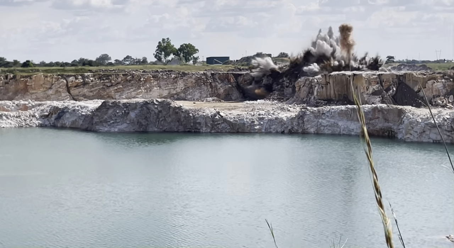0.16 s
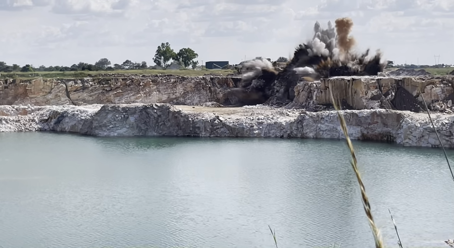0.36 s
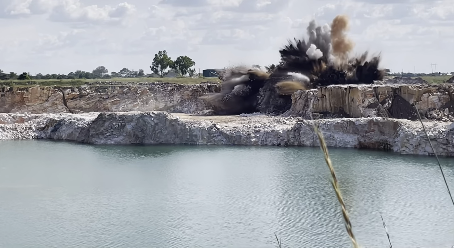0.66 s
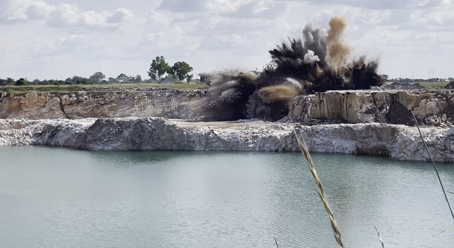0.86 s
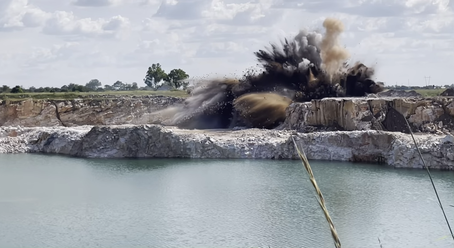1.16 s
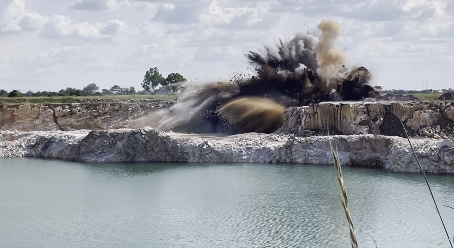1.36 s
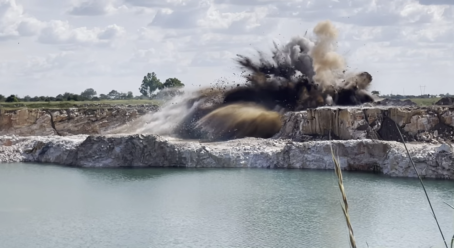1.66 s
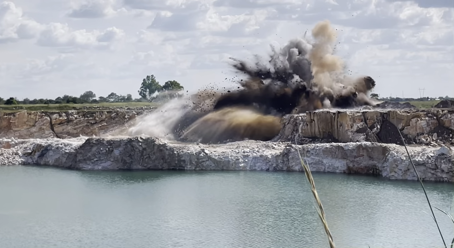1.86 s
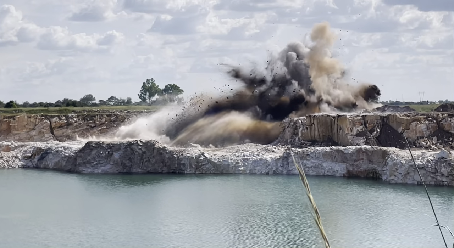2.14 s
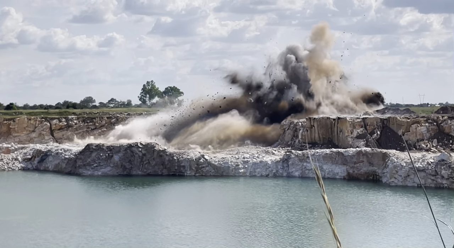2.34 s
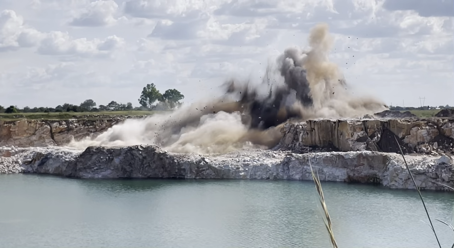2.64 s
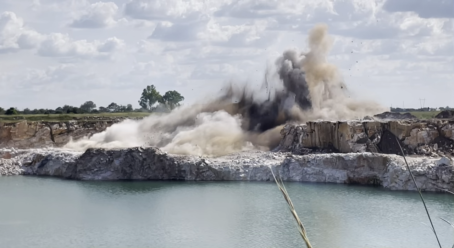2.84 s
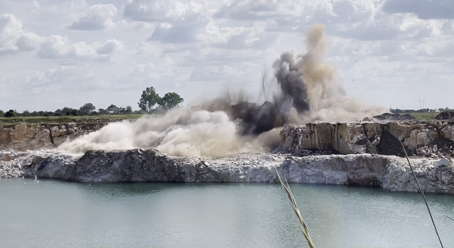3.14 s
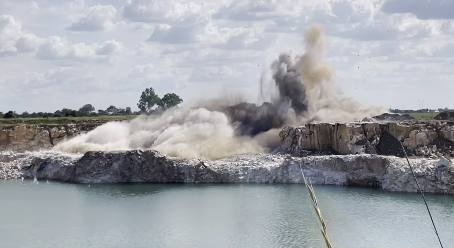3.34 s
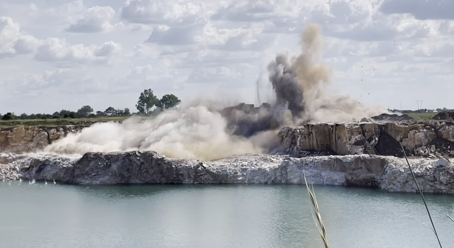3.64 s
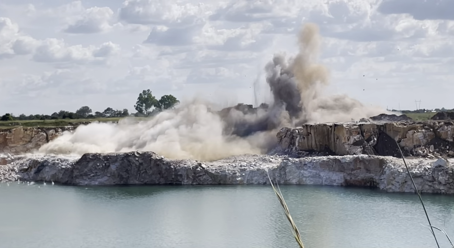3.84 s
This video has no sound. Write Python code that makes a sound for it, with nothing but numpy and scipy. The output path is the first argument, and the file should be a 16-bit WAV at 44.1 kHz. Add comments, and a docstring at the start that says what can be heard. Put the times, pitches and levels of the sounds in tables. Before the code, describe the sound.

Explosion in an open quarry, heard from a distance outdoors: rumbling drone, loud double crack echoing off rock walls, popping and heavy air thuds, then broken stone pouring down and slowly fading under microphone wind.

```python
"""Quarry blast across a flooded pit

The ground rumbles and drones first, under a faint whistle. Then the air waves arrive: a ragged crack
of dense snaps, a sharp shock with echoes, and a long crackling report, with pops and heavy thuds of air.
Broken rock pours down in a rush of knocks and grit that swells and fades, and a few stones clack.
Noise is filtered and shaped for ground, rock, wind on the microphone and open air; tones are sines."""
import sys
import numpy as np
from scipy import signal
from scipy.fft import rfft, irfft
from scipy.io import wavfile
from scipy.ndimage import uniform_filter1d

SR = 44100
rng = np.random.default_rng(int(sys.argv[2]) if len(sys.argv) > 2 else 0)


def wrap_up_sound(samples):
    """Save the sound to the file named by the first command line argument, as 16-bit audio."""
    columns = np.atleast_2d(samples).T
    # keep every value between -1 and 1, then stretch to whole-number steps
    tamed = np.clip(columns, -1, 1)
    steps = np.round(tamed * 32767).astype(np.int16)
    wavfile.write(sys.argv[1], SR, steps)


N = 176400
T, HZ = np.arange(N) / SR, np.fft.rfftfreq(N, 1 / SR)  # seconds, Hz


def amp(db):
    """Decibels to gain."""
    return 10 ** (np.asarray(db) / 20)


def unit(x):
    """Scales to rms 1."""
    return x / np.sqrt(np.mean(x ** 2) + 1e-20)


def read(points, hz=HZ):
    """Reads a spectrum table on a log-frequency axis."""
    f, value = np.transpose(points)
    return np.interp(np.log(hz + 1), np.log(f + 1), value)


def level(rows, axis=1):
    """Gain over time from a column of dB."""
    rows = np.array(rows)
    return amp(np.interp(T, rows[:, 0], rows[:, axis]))


def slow(hz):
    """Smooth random drift of rms 1, slower than about the given rate."""
    return unit(irfft(rfft(rng.standard_normal(N)) * np.exp(-(HZ / hz) ** 2), N))


def sine(pitch_hz):
    """Sine of rms 1 that follows a pitch over time."""
    return np.sqrt(2) * np.sin(2 * np.pi * np.cumsum(pitch_hz) / SR)


def colour(x, points):
    """Causal minimum-phase filter with the given spectrum."""
    log_gain = np.log(amp(read(points, abs(np.fft.fftfreq(N, 1 / SR)))))
    response = np.exp(np.conj(signal.hilbert(log_gain)))[:len(HZ)]
    return irfft(rfft(x) * response, N)


def dull(x, hz):
    """Gentle low-pass without delay."""
    return irfft(rfft(x) / (1 + (HZ / hz) ** 2), N)


def stereo(pair):
    """Turns a direct and a scattered signal into left and right at the microphone."""
    # Spread of the scattered sound. Each row: frequency in Hz, gain of the side signal in dB.
    width = [(60, -23.5), (160, -13.5), (270, -20), (440, -11), (1200, -11), (2000, -19), (3300, -7),
             (5400, -9), (8500, 10), (14000, -2.5)]
    # Lean of the picture. Each row: frequency in Hz, left minus right in dB.
    lean_db = [(100, 0), (270, 1), (450, 0.5), (1200, 2), (2000, 0.4), (3300, -0.5), (5400, 1), (8000, -1),
               (14000, -4)]
    mid, side = rfft(pair)
    side = side * amp(read(width))
    lean = amp(read(lean_db) / 2)
    return irfft(np.array([(mid + side) * lean, (mid - side) / lean]), N)


def rolling(points, evenness):
    """Low noise whose swells are partly evened out, so that it rolls on without holes."""
    z = signal.hilbert(colour(rng.standard_normal((2, N)), points))
    swell = uniform_filter1d(abs(z) ** 2, size=1200, axis=1) + 1e-14  # power over 27 ms
    return unit(stereo(z.real / swell ** (evenness / 2)))


def clicks(per_s, spread_db):
    """Two random trains of clicks, most small and a few large."""
    size = amp(spread_db * np.minimum(rng.exponential(1, (2, N)), 4))
    sign = rng.choice([-1, 1], (2, N))
    present = rng.random((2, N)) < per_s / SR
    return unit(size * sign * present)


def burst(event, spectrum):
    """Venting gas: a dense volley of snaps that rises fast, holds and dies, the treble at its own rate."""
    start_s, db, rise_s, hold_s, body_t60_s, treble_t60_s = event
    snaps = clicks(per_s=3000, spread_db=3.5) * amp(1.2 * slow(hz=60))  # flutter of 1.2 dB rms
    snaps = snaps / colour(snaps, spectrum).std()
    body = dull(snaps, hz=1690)
    treble = snaps - body
    age = np.maximum(T - start_s - rise_s - hold_s, 0)
    volley = body * amp(-60 * age / body_t60_s) + treble * amp(-60 * age / treble_t60_s)
    rise = np.clip((T - start_s) / rise_s, 0, 1)
    return amp(db) * stereo(colour(rise * volley, spectrum))


def ground():
    """Rumble, a drone of two wavering modes and the roar of heaving rock; a fade begins at 1.7 s."""
    # Deep rumble of the ground and the blast. Each row: time in seconds, level in dB.
    rumble = [(0.0, -13), (0.024, -17.5), (.09, -17), (0.155, -13.5), (0.23, -16.5), (0.28, -27),
              (0.33, -15), (0.376, -24), (0.43, -17.5), (0.446, -26.5), (0.49, -19), (0.526, -21),
              (0.586, -23), (0.63, -5), (.7, -14.5), (0.782, -26), (0.83, -25.5), (0.916, -12.5),
              (.96, -10.5), (1.02, -17), (1.15, -17.5), (1.38, -20.5), (1.534, -24), (1.8, -36.5)]
    # Spectrum of the rumble. Each row: frequency in Hz, gain in dB.
    rumble_colour = [(15, -42), (30, -14), (45, -6.5), (63, -1), (85, -5.5), (115, -14), (200, -31),
                     (400, -45.5), (900, -90.5)]
    # Low roar of heaving rock. Each row: time in seconds, level in dB.
    heave = [(0.0, -37.5), (0.094, -45), (0.154, -42), (0.34, -39.5), (.41, -28), (0.47, -31.5),
             (.53, -20.5), (.575, -25.5), (.62, -17), (0.686, -19), (0.71, -21), (0.792, -34),
             (0.94, -24.5), (0.962, -16), (1.432, -38.5), (1.488, -33), (1.628, -38.5), (1.8, -33)]
    # Spectrum of the roar. Each row: frequency in Hz, gain in dB.
    heave_colour = [(80, -42.5), (140, -1.5), (185, -0.5), (260, -5), (350, -12.5), (500, -24),
                    (1000, -44.5), (2500, -88)]
    # Drone of the shaking ground. Each row: time in seconds, lower mode in dB, upper mode in dB.
    drone = [(0, -25.5, -42), (.08, -43, -45), (.16, -23, -35.5), (.27, -24.5, -44.5), (.37, -33, -36.5),
             (.405, -18.5, -29.5), (.5, -12, -22), (.532, -30, -27.5), (.562, -10, -30), (.61, -17, -19.5),
             (.68, -31, -25), (.71, -19.5, -12), (.745, -30, -33.5), (.8, -25, -53), (.9, -48.5, -46.5)]
    lower_hz, upper_hz, waver = 129.6, 183.9, 0.026  # waver: rms fraction of the pitch
    low = level(rumble) * rolling(rumble_colour, evenness=0.7)
    low = low + level(heave) * rolling(heave_colour, evenness=0.58)
    lower = sine(lower_hz * (1 + waver * slow(hz=30.6)))
    upper = sine(upper_hz * (1 + waver * slow(hz=30.6)))
    fade = amp(-45 * np.maximum(T - 1.7, 0))  # 45 dB per second
    return fade * (low + level(drone) * lower + level(drone, axis=2) * upper)


def whistle():
    """A thin wavering sine slides mostly downward under the first rumble."""
    # Faint falling whistle. Each row: time in seconds, pitch in Hz, level in dB.
    glide = [(0, 3400, -80), (.012, 3000, -72), (.02, 2840, -65), (.03, 2840, -64), (.04, 2860, -79),
             (.06, 2880, -79), (.08, 3000, -95), (.125, 3020, -75), (.14, 2820, -87), (0.181, 2720, -78),
             (.2, 2600, -85), (.22, 2540, -76), (.243, 2350, -72), (.26, 2320, -87)]
    s, hz, _ = np.transpose(glide)
    pitch = np.interp(T, s, hz) * (1 + 0.02 * slow(hz=200))  # waver of 2 % rms
    return level(glide, axis=2) * (T < s[-1]) * sine(pitch)


def open_air():
    """Faint steady noise of the open air around the microphone."""
    # Spectrum of the air. Each row: frequency in Hz, gain in dB.
    air_colour = [(100, -8.5), (1000, -1.5), (3000, 1.5), (6000, -25.5), (14000, -37.5)]
    return amp(-73) * unit(stereo(colour(rng.standard_normal((2, N)), air_colour)))


def rockfall():
    """Thousands of stones knock together over a wash of grit, the treble with a level of its own."""
    # Rush of breaking and falling rock. Each row: time in seconds, level in dB, extra treble level in dB.
    rush_levels = [(0, -72, -1), (.2, -60, -12), (.35, -55.5, -30.5), (.42, -40.5, -50), (.6, -35.5, -37),
                   (.64, -18.5, -22.5), (.72, -28.5, 1.5), (.81, -42, -3.5), (.89, -31, -2.5),
                   (1.1, -31, 0), (1.35, -32.5, -4.5), (1.8, -31.5, -1.5), (2.2, -30.5, 3.5),
                   (2.62, -31, 5.5), (3, -32, 1.5), (3.4, -36, 0), (4, -39.5, -0.5)]
    # Spectrum of the rush. Each row: frequency in Hz, gain in dB.
    rush_colour = [(70, -20.5), (130, 1.5), (220, 0), (380, -6), (480, -5), (750, -4.5), (1000, -9.5),
                   (1300, -9), (2000, -13.5), (2800, -16.5), (4000, -22), (5500, -30), (7100, -37.5),
                   (8100, -50.5), (8800, -73), (11000, -59.5), (15000, -90)]
    grit = 0.82 * rng.standard_normal((2, N))  # rms relative to the knocks
    knocks = clicks(per_s=3000, spread_db=2.0)
    rush = unit(stereo(colour(knocks + grit, rush_colour)))
    rush = rush * amp(0.46 * slow(hz=25.3))  # flutter of 0.46 dB rms
    body = dull(rush, hz=1500)
    treble = rush - body
    return level(rush_levels) * (body + level(rush_levels, axis=2) * treble)


def crack():
    """The ragged crack: a short burst of venting gas."""
    # One burst: start in seconds, level in dB, rise in s, hold in s, body t60 in s, treble t60 in s.
    event = (.611, -6, .005, .008, .035, .04)
    # Spectrum of the crack. Each row: frequency in Hz, gain in dB.
    crack_colour = [(60, -28), (150, -2.5), (330, 12.5), (480, 0), (780, 5), (1100, -2), (1700, -5),
                    (2200, -14.5), (4000, -27.5), (6000, -42), (7800, -51), (9000, -64.5), (16000, -69.5)]
    return burst(event, crack_colour)


def thuds():
    """Air pushed out by the heaving rock: each thud swells within one cycle and dies over the next few."""
    # Heavy thuds. Each row: start in seconds, pitch in Hz, peak of the swell in dB.
    thud_rows = [(.6162, 372, -3.5), (0.624, 58.7, -2), (0.908, 64, -10), (1.005, 77.3, -6.5),
                 (1.084, 101, -9.5), (1.188, 69, -13)]
    out = np.zeros(N)
    for s, hz, db in thud_rows:
        cycles = hz * np.maximum(T - s, 0)
        swell = (cycles * np.exp(1 - cycles)) ** 2
        out += amp(db) * swell * np.sin(2 * np.pi * cycles)
    return out


def pops():
    """Pockets of gas break out: a hard front and a brief scatter, duller from deeper in the rock."""
    # Pops in the crack and report. Each row: start in seconds, peak before colouring in dB, treble corner in Hz.
    pop_rows = [(0.6177, -4.5, 2140), (0.621, -6, 2800), (0.625, -15, 2400), (0.9493, 2.5, 5920),
                (.9615, -8, 2800), (0.9688, -10, 2010), (0.9733, -5.5, 1600), (1.0035, -20, 1830),
                (1.0155, -13, 1940), (1.0441, -9, 1500), (1.073, -18, 2400), (1.0891, -11.5, 1600),
                (1.099, -16, 2190), (1.1172, -16.5, 1800), (1.127, -17.5, 1500), (1.1585, -19, 1900),
                (1.203, -32, 1300)]
    # Spectrum of the pops. Each row: frequency in Hz, gain in dB.
    pop_colour = [(100, -16.5), (300, -5.5), (800, -3.5), (1700, 3.5), (4000, -9), (6000, -16.5),
                  (7800, -18), (9000, -40), (16000, -53)]
    t60_s, scatter = 0.014, 0.077  # scatter: rms relative to the front
    out = np.zeros((2, N))
    for s, db, treble_hz in pop_rows:
        decay = amp(-60 * abs(T - s) / t60_s) * (T > s)
        pop = scatter * rng.standard_normal((2, N)) * decay
        pop[0, round(s * SR)] += 1
        pop = signal.lfilter(*signal.butter(2, treble_hz, fs=SR), pop)
        out += amp(db) * pop / abs(pop[0]).max()
    return stereo(colour(out, pop_colour))


def shocks():
    """Sharp swings of pressure; the first trails a thump whose cycles grow longer and longer."""
    # Shock fronts and their echoes. Each row: time in seconds, level of each half-swing in dB.
    fronts = [(0.7025, 2.5), (0.7142, -13), (0.7366, -25), (0.947, -21)]
    # Spectrum of the fronts. Each row: frequency in Hz, gain in dB.
    shock_colour = [(100, -20.5), (500, -1), (2000, 7.5), (4000, 1), (6000, 1.5), (8300, -3),
                    (10500, -20.5), (13500, -2), (15500, -24)]
    swing_s = 0.00011  # from the downward pulse to the upward one
    train = np.zeros(N)
    for s, db in fronts:
        train[round(s * SR)] -= amp(db)
        train[round((s + swing_s) * SR)] += amp(db)
    single_pulse = colour(1. * (T == 0), shock_colour)
    sharp = colour(train, shock_colour) / abs(single_pulse).max()
    thump_db, thump_t60_s, first_period_s, stretch = -1, 0.14, 0.000838, 0.72
    age = np.maximum(T - fronts[0][0], 0)
    turns = np.log1p(stretch * age / first_period_s) / stretch
    thump = amp(thump_db - 60 * age / thump_t60_s) * np.sin(2 * np.pi * turns)
    return sharp + thump


def from_left(x):
    """The wave reaches the right side of the microphone a moment after the left."""
    lag_s = 0.00002
    right = irfft(rfft(x) * np.exp(-2j * np.pi * HZ * lag_s), N)
    return np.array([x, right])


def walls(x):
    """Scattered echoes from the rock faces: sparse random reflections that die at a rate set by pitch."""
    # Ring of the quarry walls. Each row: frequency in Hz, time to fall 60 dB in seconds.
    echo_t60 = [(100, 0.51), (1000, 0.22), (5000, 0.028), (14000, 0.2)]
    present = rng.random((2, SR)) < 3000 / SR  # reflections per second
    taps = rng.standard_normal((2, SR)) * present * (T[:SR] > 0.0078)  # none before 7.8 ms
    hz, t, z = signal.stft(taps, SR, nperseg=256)
    decay = amp(-60 * t / read(echo_t60, hz)[:, None])
    tail = signal.istft(z * decay, SR, nperseg=256)[1]
    tail = tail / np.linalg.norm(tail[0])
    return stereo(signal.fftconvolve(x[None], tail, axes=1)[:, :N])


def report():
    """The long crackling report: a burst of venting gas that dies slowly."""
    # One burst: start in seconds, level in dB, rise in s, hold in s, body t60 in s, treble t60 in s.
    event = (.9425, -15.5, .004, .045, .88, .88)
    # Spectrum of the report. Each row: frequency in Hz, gain in dB.
    report_colour = [(60, -22.5), (150, -3.5), (260, 9), (400, 0), (700, 1.5), (1300, -4.5), (1700, -12.5),
                     (2200, -15), (4000, -20.5), (6000, -31), (7800, -42.5), (9000, -72.5), (16000, -78)]
    return burst(event, report_colour)


def wind():
    """Low buffets of noise on the microphone, faded in from 1.5 s."""
    # Buffets of wind. Each row: time in seconds, level before the fade-in in dB.
    buffets = [(1.6, -21), (1.8, -28), (1.85, -24.5), (1.9, -28), (2.03, -31), (2.09, -24.5), (2.19, -36),
               (2.26, -28), (2.38, -35), (2.46, -25), (2.52, -33.5), (2.56, -25), (2.63, -29.5), (2.8, -37),
               (2.96, -39), (3.01, -29), (3.07, -37), (3.3, -32.5), (3.46, -40), (3.8, -40), (4, -36.5)]
    # Spectrum of the wind. Each row: frequency in Hz, gain in dB.
    wind_colour = [(15, -12), (30, -15.5), (56, -1), (90, -2.5), (130, -14.5), (220, -32), (500, -46),
                   (1000, -97)]
    fade_in = np.clip((T - 1.5) / 0.46, 0, 1)
    return level(buffets) * fade_in * rolling(wind_colour, evenness=0.4)


def clacks():
    """Stone on stone: a short dry ring of noise in one broad band."""
    # Single stones in the fading rush. Each row: start in seconds, peak before the stereo spread in dB, pitch in Hz.
    clack_rows = [(2.3, -31, 3780), (3.2148, -39, 3820), (3.289, -40, 5300), (3.7364, -35.5, 3300)]
    t60_s, width_octaves = 0.043, 0.18
    out = np.zeros((2, N))
    for s, db, hz in clack_rows:
        band = np.exp(-(np.log2((HZ + 1) / hz) / width_octaves) ** 2)
        rattle = rng.standard_normal((2, N)) * amp(-60 * abs(T - s) / t60_s) * (T > s)
        ring = irfft(rfft(rattle) * band, N)
        out += amp(db) * ring / abs(ring).max()
    return stereo(out)


def scene():
    """Blast, rockfall, wind and open air together."""
    shock = shocks()
    echoes = amp(-14.5) * walls(dull(shock, hz=8000))
    blast = crack() + thuds() + pops() + from_left(shock) + echoes + report()
    return ground() + whistle() + open_air() + rockfall() + blast + wind() + clacks()


def record(dry):
    """The loudest peaks are rounded off below a ceiling; then a low-pass limits the band."""
    ceiling, knee, edge_hz = 0.9, 6.0, 15600  # a higher knee rounds more abruptly
    squashed = dry / (1 + abs(dry / ceiling) ** knee) ** (1 / knee)
    band_limit = signal.firwin(511, edge_hz, window=("kaiser", 9), fs=SR)
    return signal.oaconvolve(squashed, band_limit[None], "same")


dry = scene()
out = record(dry)
wrap_up_sound(out)
```